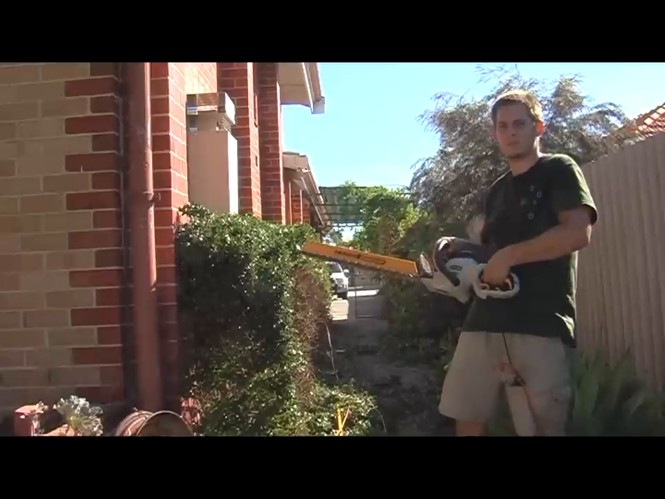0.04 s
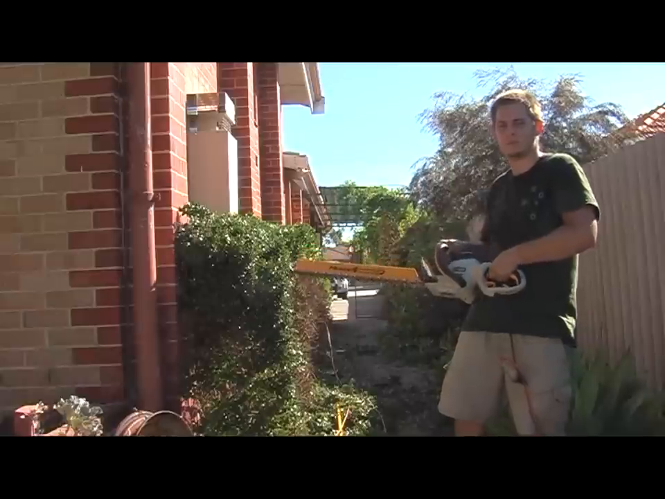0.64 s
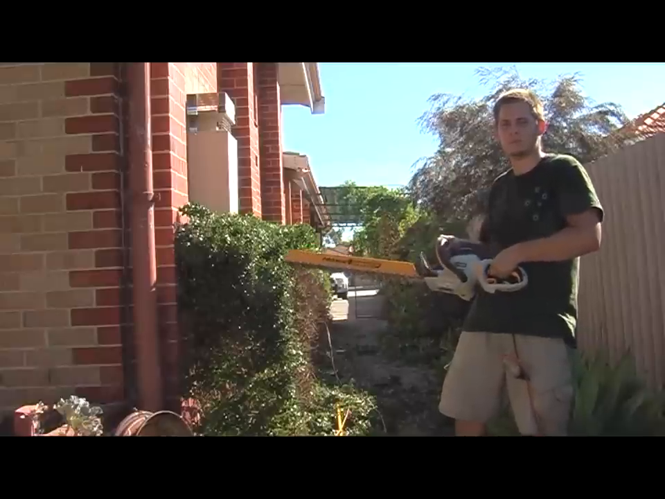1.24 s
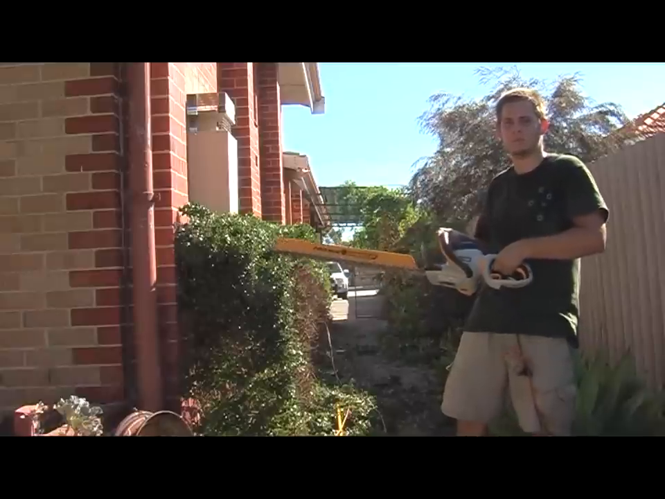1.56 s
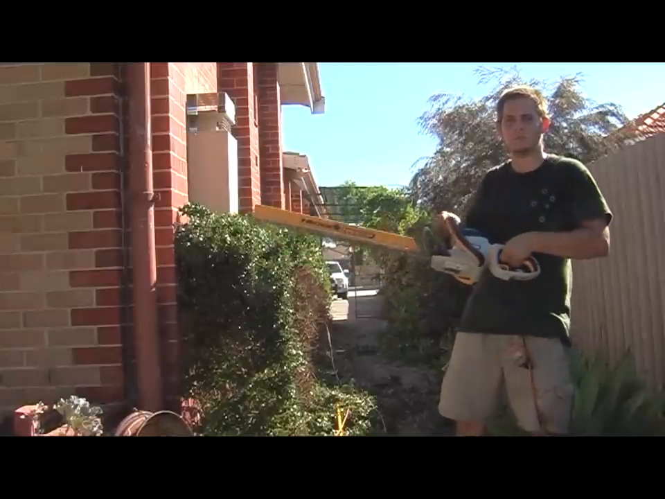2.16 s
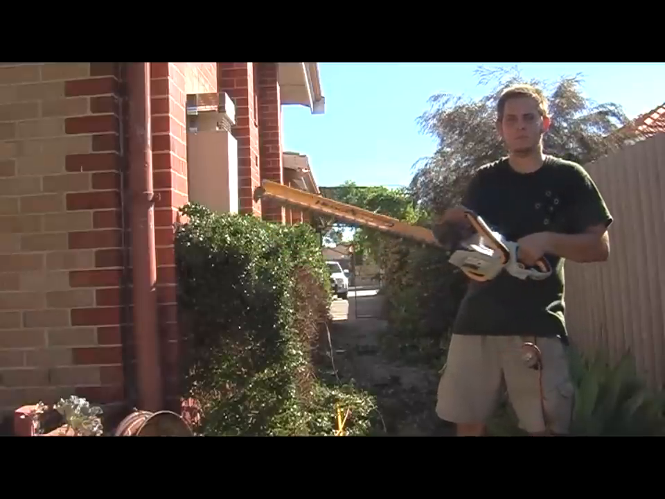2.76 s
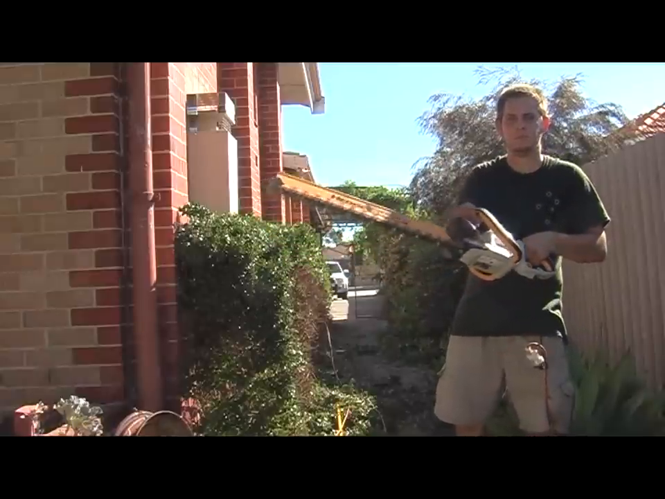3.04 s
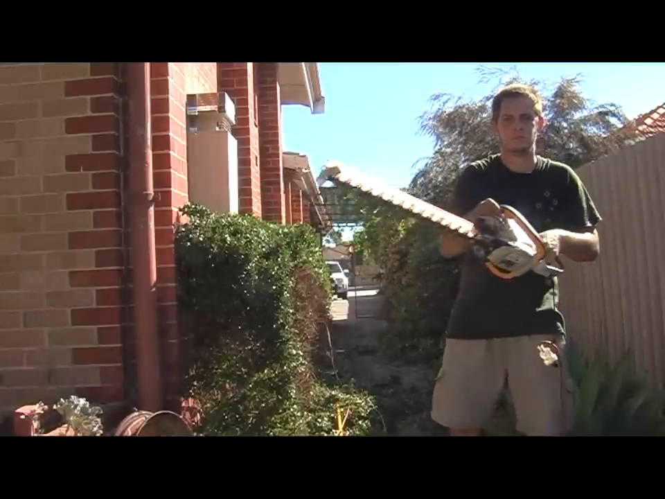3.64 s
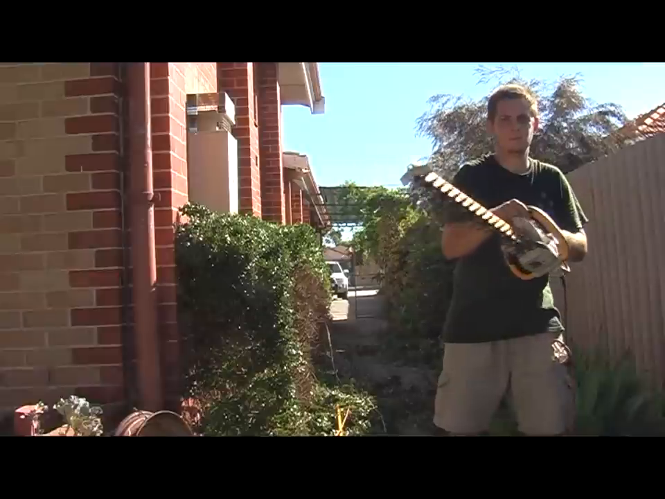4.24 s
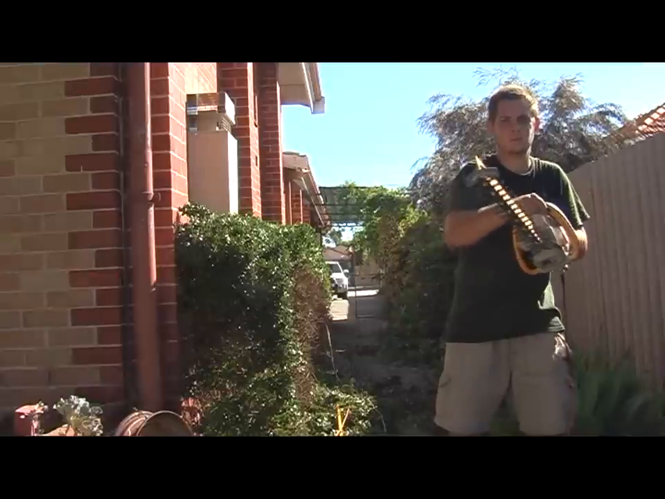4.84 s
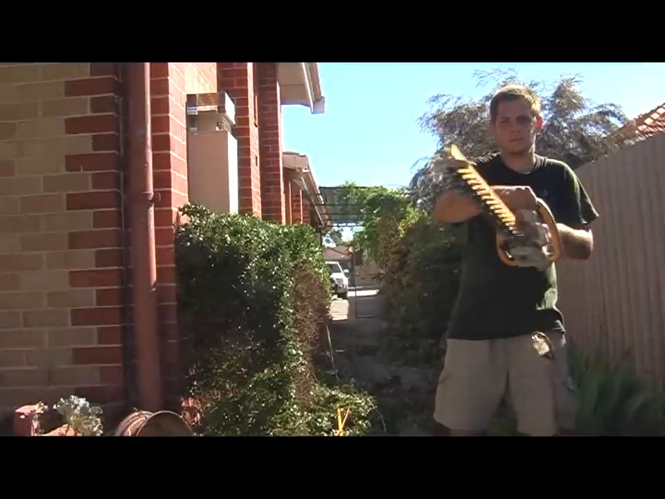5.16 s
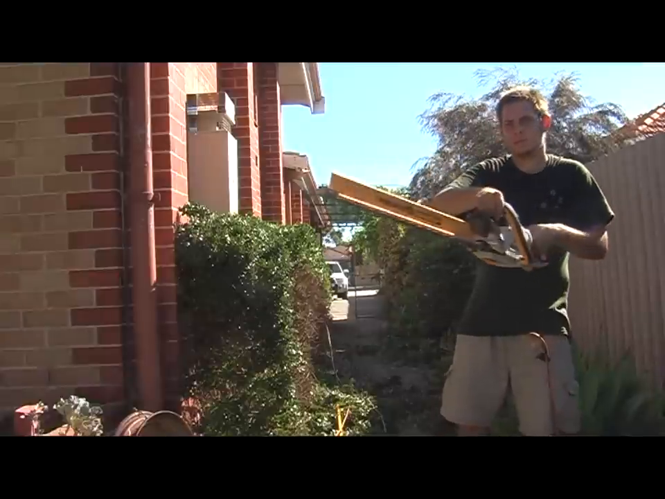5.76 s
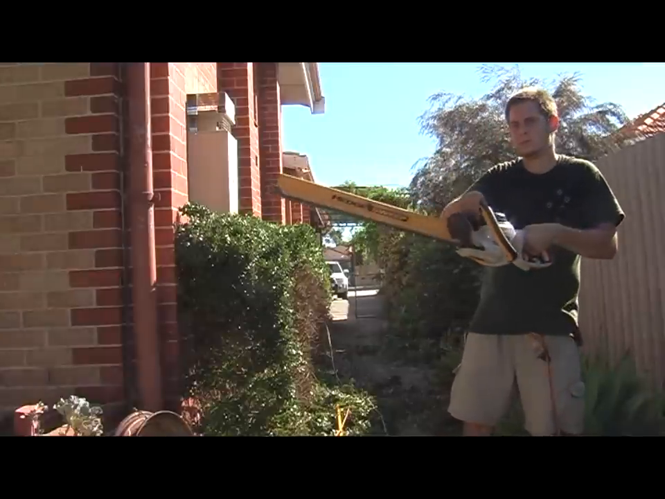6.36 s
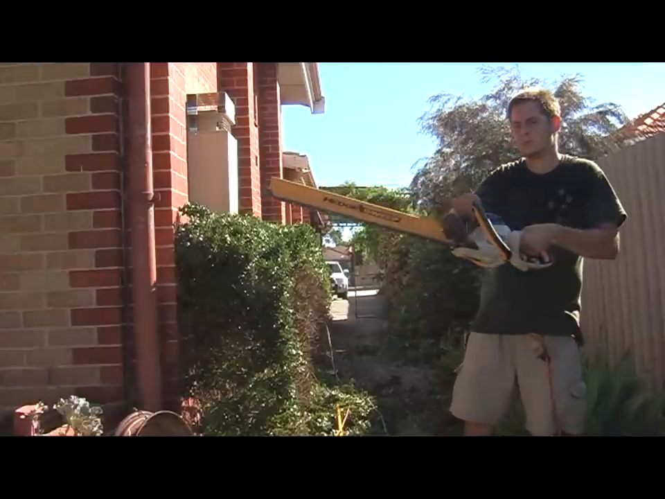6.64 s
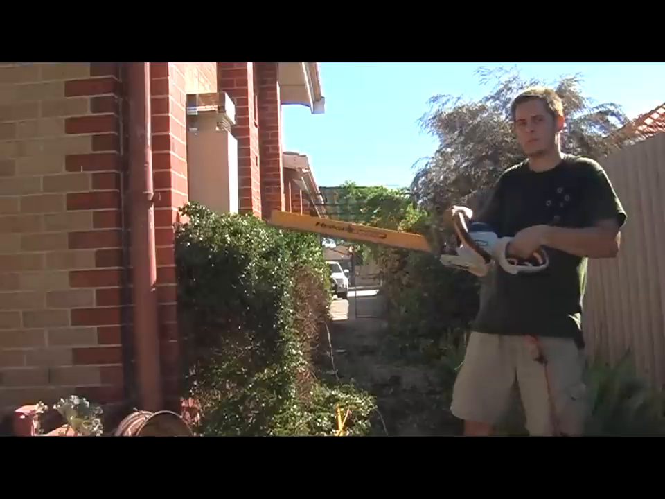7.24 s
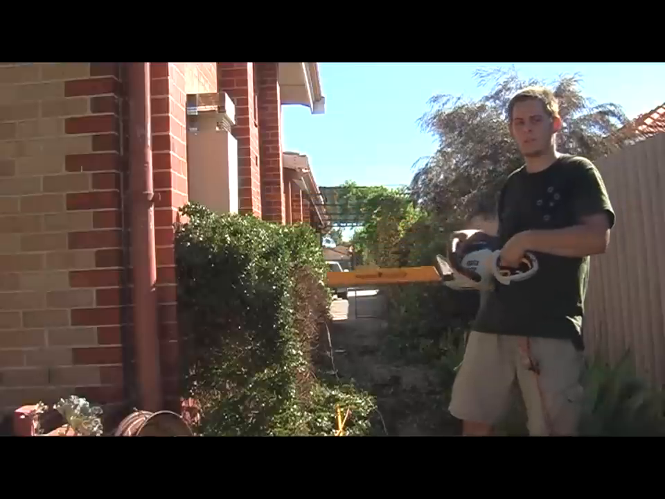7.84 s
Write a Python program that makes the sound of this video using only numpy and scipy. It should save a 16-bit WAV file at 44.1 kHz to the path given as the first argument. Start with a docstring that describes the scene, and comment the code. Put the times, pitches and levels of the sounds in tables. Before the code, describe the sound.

After faint distant traffic and some switch clicks, an electric hedge trimmer starts and keeps buzzing, its blades clattering freely.

```python
"""In a small walled garden, over distant traffic and a breeze, a hedge trimmer starts and runs free.
Safety catch and trigger click; the motor whines up and, through a 4:69 gear, cranks two steel blades.
Periodic forces give the tones (shaft hum, commutator, fan, gear mesh); knocks and friction give the
clatter and rasp. The machine radiates directionally, so its timbre changes as it is turned about.
The walls scatter echoes, and the camera's gain control pushes the garden away once the motor runs."""
import sys
import numpy as np
from scipy import signal
from scipy.fft import rfft, irfft, next_fast_len
from scipy.io import wavfile
from scipy.ndimage import uniform_filter1d, map_coordinates

SR = 44100
rng = np.random.default_rng(int(sys.argv[2]) if len(sys.argv) > 2 else 0)


def wav_record(signal):
    """Record a signal, one row per channel, as 16-bit PCM in the file named by sys.argv[1]."""
    frames = np.transpose(np.atleast_2d(signal))
    bounded = np.clip(frames, -1, 1)
    # unit amplitude maps onto the largest positive 16-bit level
    quanta = np.round(bounded * 32767).astype(np.int16)
    wavfile.write(sys.argv[1], SR, quanta)


N = 348831
TIME = np.arange(N) / SR

START_S, BITE_S, RUNNING_S = 0.785, 0.812, 0.832  # motor starts, drive bites, slack is gone
PINION_TEETH, WHEEL_TEETH, COMMUTATOR_BARS, FAN_BLADES = 4, 69, 12, 17
TOP_HZ = 463.5  # top speed of the shaft

# spectrum of traffic and breeze: (frequency [Hz], relative level [dB])
GARDEN_SPECTRUM = [(15, -45), (25, -16), (94, 0), (152, -8.5), (189, -1.5), (276, -3.5), (361, -2.5),
                   (392, -4.5), (513, -5.5), (1680, -13), (5220, -31.5), (7820, -34), (15800, -51)]
# reverberation of the walls: (frequency [Hz], t60 [s])
WALL_DECAY = [(200, 0.3), (2000, 0.38), (8000, 0.13), (16000, 0.37)]
# modes of the steel bar: (frequency [Hz], initial level [dB], t60 [s])
STEEL_MODES = [(4000, -41, 0.7), (6804, -48, .5), (6944, -44, .31)]
# catch, grip, trigger, first jolt of the blades: (time [s], level [dB], ring [Hz], ring share, t60 [s])
SNAPS = [(0.01, -39, 8500, 0.4, 0.4), (0.190, -22.5, 4500, 0.28, 0.091), (0.194, -9.5, 1900, 0.98, 0.02),
         (0.2656, -13.5, 7100, 0.35, 0.049), (0.297, -32, 3900, 0.4, 0.44), (0.431, -29, 9000, 0.5, .03),
         (0.445, -22.5, 7900, 0.45, 0.036), (0.588, -31, 1700, 0.9, 0.073),
         (0.688, -16.5, 1050, 0.62, 0.033), (0.7855, -7, 7150, 0.53, 0.027), (0.821, -2.5, 500, 0.9, 0.12)]
# noisy part of a snap: (frequency [Hz], relative level [dB])
SNAP_SPECTRUM = [(200, -30), (1200, 0), (3500, 2.5), (6000, -5), (9000, -3), (12000, -15), (16000, -26)]
# quick and slow stage of the run-up: (speed still to gain [Hz], time constant [s])
RUN_UP_STAGES = [(206.4, .12), (185.6, .34)]
# sag of the running motor: (time [s], speed lost [Hz])
SPEED_SAG = [(2.5, 0), (3.3, 1.1), (4.5, 2.1), (5.1, 1.9), (5.5, 3.8), (7.9, 3.3)]
# swing of the bar towards the microphone and back: (time [s], angle from side-on [deg])
BAR_ANGLE = [(1.6, -5), (2.2, 12), (2.6, 15), (3.2, 32), (3.9, 65), (4.6, 104), (5.1, 62), (5.5, 52),
             (6.0, 46), (6.5, 25), (7.1, 15), (7.7, 5)]
# radiation of tones: (angle [deg], shaft hum [dB], third order [dB], second gear harmonic [dB], fan [dB])
TONE_DIRECTIVITY = [(0, -39, -41, -35.5, -25), (10, -30, -34, -35.5, -26.5), (22.7, -34.5, -32, -37, -22.5),
                    (34, -36, -28.5, -37.5, -24), (52, -33.5, -31, -36, -23.5),
                    (72.5, -41.5, -26.5, -37, -25.5), (86, -50, -33, -48, -31)]
# radiation of noises: (angle [deg], housing boom [dB], ring [dB], gearbox clatter [dB], blade rasp [dB])
NOISE_DIRECTIVITY = [(0, -32.5, -21, -15.5, -20), (11.4, -30.5, -27, -15.5, -18.5),
                     (35.2, -34.5, -29, -15, -18), (88, -35.5, -34, -17.5, -18.5)]
# faces of the housing swinging past: (time [s], half length [s], frequency [Hz], gain [dB])
HOUSING_FLARES = [(1.548, 0.13, 3520, 4), (1.8, 0.1, 1370, 2), (2.22, 0.11, 3160, 5.5),
                  (2.52, 0.13, 7860, 3), (4.92, 0.16, 2180, 9), (5.6, 0.45, 7820, -4),
                  (5.8, 0.38, 2890, 7.5), (6.9, 0.23, 7820, 1), (6.95, 0.78, 3610, 7.5),
                  (7.283, 0.16, 2100, 6), (7.87, 0.073, 7820, 6.5)]
# weak partials of the motor: (shaft order, sideband [multiples of the stroke rate])
WEAK_ORDERS = [(1, 1), (2, -2), (2, 0), (3, -1), (5, -2), (5, -1), (5, 0), (6, 0), (7, -1), (7, 0), (9, -1)]
# strength of each weak partial: (relative level [dB])
WEAK_ORDER_DB = [-39, -37, -35.5, -38, -51, -29, -55, -41, -58, -39, -56]
# housing boom, gearbox clatter and blade rasp: (frequency [Hz], relative level [dB])
BOOM_SPECTRUM = [(100, -54), (280, -13.5), (370, -5.5), (440, -9.5), (520, -0.5), (700, -6.5), (1400, -33)]
CLATTER_SPECTRUM = [(150, -41.5), (350, -14.5), (650, -5), (1000, -1), (1450, -1.5), (1750, 2.5),
                    (2050, 3.5), (2300, 0.5), (2550, -1.5), (3100, -1.5), (4300, -8.5), (5700, -13.5),
                    (9000, -31), (16000, -69)]
RASP_SPECTRUM = [(800, -26), (2500, -13), (4400, 3.5), (5800, -8.5), (6600, 0), (7400, -0.5), (8300, 3),
                 (9400, -1), (10800, -2.5), (12500, -10), (14500, -16.5), (16000, -22)]
# modes of housing and blade bar: (frequency [Hz], bandwidth [Hz], relative level [dB])
BODY_MODES = [(515, 76, -3), (964, 120, -4), (1422, 113, -1), (1550, 220, -6), (1980, 130, 3),
              (3084, 77, -10.5), (3510, 69, -12), (8060, 120, -15)]
# gear whine: (time [s], relative level [dB], strongest sideband [multiples of the stroke rate])
GEAR_WHINE = [(1.0, -32, 0.13), (1.3, -22.5, -0.94), (1.6, -26, 1.1), (1.9, -17, -0.54), (2.15, -26, -0.22),
              (2.9, -35, 0.86), (3.4, -23.5, 1.8), (3.9, -23.5, 0.25), (4.6, -19.5, -0.71),
              (5.2, -23.5, 0.47), (5.65, -17, 0.98), (5.9, -18, -0.37), (6.3, -19.5, 1.3),
              (7.2, -27, -0.32), (7.6, -24, .4), (7.9, -16, 1.6)]
# filter of the stereo side signal: (frequency [Hz], gain [dB])
SIDE_GAIN = [(60, -15), (150, -8), (330, -14), (700, -12.5), (2800, -7), (5600, 0), (10000, 1), (14000, 3)]
# channel imbalance: (frequency [Hz], gain added left and taken from the right [dB])
LEFT_TILT = [(100, 0.5), (9000, -0.36), (13000, 1.5), (16000, 2)]
# the camera's hum notches: (frequency [Hz], depth [dB])
HUM_NOTCHES = [(300, 6), (600, 8.5), (900, 2.5), (1500, 1.5), (2400, 5.5), (3900, 14.5), (6000, 0.5)]


def amp(db):
    """Amplitude ratio of a level in decibels."""
    return 10 ** (np.asarray(db) / 20)


def unit(x):
    """Normalisation to rms 1."""
    return x / np.sqrt(np.mean(x ** 2) + 1e-20)


def curves(rows):
    """Linear interpolation of each column of a table over time."""
    times, *columns = np.transpose(rows)
    return [np.interp(TIME, times, column) for column in columns]


def at_hz(points, hz):
    """Interpolation on a logarithmic frequency axis."""
    frequencies, values = np.transpose(points)
    return np.interp(np.log(hz + 1), np.log(frequencies + 1), values)


def colour(x, points):
    """Linear filtering: the spectrum of x is multiplied by a gain curve."""
    size = next_fast_len(len(x))
    gain = amp(at_hz(points, np.fft.rfftfreq(size, 1 / SR)))
    return irfft(rfft(x, size) * gain, size)[:len(x)]


def drift(rate_hz):
    """Smooth random fluctuation of rms 1."""
    knots = rng.standard_normal(N // 16)
    return unit(map_coordinates(knots, [TIME[::16] * rate_hz], order=3, mode="wrap")).repeat(16)[:N]


def bump(s, width_s):
    """Gaussian pulse of height 1 around time s."""
    return np.exp(-((TIME - s) / width_s) ** 2)


def resonate(x, hz, width_hz):
    """Forced resonance, cascaded twice for steep flanks; rms 1."""
    b, a = signal.iirpeak(hz, hz / (1.55 * width_hz), fs=SR)
    return unit(signal.lfilter(b, a, signal.lfilter(b, a, x)))


def garden(air_db=-30, puff_db=6):
    """Ambient noise: distant traffic and a breeze add incoherently, with one puff of wind."""
    level_db = air_db + puff_db * bump(1.95, width_s=0.15) + 0.85 * drift(27)
    return amp(level_db) * unit(colour(rng.standard_normal(N), GARDEN_SPECTRUM))


def walls(x, echoes_per_s=2500, first_echo_s=0.012):
    """Reverberation: brick and fence scatter echoes, each band decaying at its own rate."""
    count = SR // 2
    echoes = rng.standard_normal(count) * (rng.random(count) < echoes_per_s / SR)
    echoes *= TIME[:count] > first_echo_s
    hz, t, bands = signal.stft(echoes, SR, nperseg=256)
    decay = amp(-60 * t / at_hz(WALL_DECAY, hz)[:, None])
    tail = signal.istft(bands * decay, SR, nperseg=256)[1]
    return signal.fftconvolve(x, tail / np.linalg.norm(tail))[:N]


def bar_ring(struck_s=0.2656):
    """Free vibration: jolted by the safety catch, the steel bar rings faintly in damped modes."""
    t = np.maximum(TIME - struck_s, 0)
    return sum(amp(db - 60 * t / t60) * np.sin(2 * np.pi * hz * t) for hz, db, t60 in STEEL_MODES)


def clicks():
    """Impact excitation: each snap is a decaying noise burst that rings the plastic handle."""
    out, t = np.zeros(N), np.arange(SR // 4) / SR
    for s, db, hz, share, t60 in SNAPS:
        burst = rng.standard_normal(len(t))
        snap = share * resonate(burst, hz, 0.3 * hz) + (1 - share) * unit(colour(burst, SNAP_SPECTRUM))
        out[round(s * SR):][:len(t)] += amp(db - 60 * t / t60) * snap
    return out


def shaft_speed():
    """Exponential approach to top speed in two stages, less a slight sag; in turns per second."""
    elapsed = np.maximum(TIME - START_S, 0)
    shortfall_hz = sum(hz * np.exp(-elapsed / tau) for hz, tau in RUN_UP_STAGES)
    return TOP_HZ - shortfall_hz - curves(SPEED_SAG)[0]


def motor_load():
    """Current falls linearly with speed: 1 at stall, 0 at top speed."""
    return 1 - shaft_speed() / TOP_HZ


def facing(directivity):
    """Directivity: the levels that the turning machine radiates towards the microphone."""
    degrees, *columns = np.transpose(directivity)
    angle, = curves(BAR_ANGLE)
    return [np.interp(angle, degrees, column) for column in columns]


def patched(x, patchy_db):
    """Shifting reflection off the ground, modelled as random gain patches in time and frequency."""
    bands = signal.stft(x, nperseg=1024)[2]
    patches = rng.standard_normal(bands.shape)
    for _ in range(2):
        patches = uniform_filter1d(uniform_filter1d(patches, size=32, axis=1), size=3, axis=0)
    return signal.istft(bands * amp(patchy_db * unit(patches)), nperseg=1024)[1][:N]


def flared(x, width_hz=91):
    """Beaming: a narrow band swells or fades as a face of the housing swings past."""
    out = x
    for s, half_length, hz, db in HOUSING_FLARES:
        band = signal.lfilter(*signal.iirpeak(hz, hz / width_hz, fs=SR), x)
        out = out + (amp(db) - 1) * bump(s, half_length) * band
    return out


def partial(cycles, db, waver=0.28, wander=0.072):
    """Random modulation of a sinusoid: its amplitude wavers and its phase wanders."""
    phase = cycles + rng.random() + wander * drift(9)
    return np.sqrt(2) * amp(db) * (1 + waver * drift(25)) * np.cos(2 * np.pi * phase)


def motor(turns, strokes, surge_db=17, surge_load=0.067, fan_flutter_db=1.4):
    """Periodic forcing: shaft, commutator, fan and teeth sound at multiples of the rotation rate."""
    hum_db, third_db, overtone_db, fan_db = facing(TONE_DIRECTIVITY)
    load = motor_load()
    spin_db = -40 * load  # imbalance sounds only once the shaft spins fast
    out = partial(turns, hum_db + spin_db) + partial(3 * turns, third_db + spin_db)
    brush_db = -42.5 + surge_db * np.tanh(load / surge_load)  # current strengthens the whine
    out += (1 - load) * partial(COMMUTATOR_BARS * turns, brush_db)
    fan_db = fan_db - 85 * load + fan_flutter_db * drift(7.7)
    out += partial(FAN_BLADES * turns, fan_db, waver=0.13, wander=0.04)
    gear_overtone = 2 * PINION_TEETH * turns
    out += partial(gear_overtone, overtone_db) + partial(gear_overtone - strokes, overtone_db)
    for (order, sideband), db in zip(WEAK_ORDERS, WEAK_ORDER_DB):
        level_db = db + spin_db + 2 * drift(3.06)
        out += partial(order * turns + sideband * strokes, level_db, waver=0.2, wander=0.029)
    return out


def knocks(strokes, decay_strokes, depth, uneven=0.8):
    """Backlash: the envelope jumps by a random amount as each stroke takes up slack, then decays."""
    size = 1 + uneven * rng.uniform(-1, 1, 1000)[strokes.astype(int) % 1000]
    return 1 + depth * size * np.exp(-(strokes % 1) / decay_strokes)


def blades(strokes, ticks_per_s=2000):
    """Impact and friction: at every stroke the crank knocks in its housing and steel rasps on steel."""
    boom_db, ring_db, clatter_db, rasp_db = facing(NOISE_DIRECTIVITY)
    load = motor_load()
    air, gears, steel, grit, blows = rng.standard_normal((5, N))
    ticks = unit(grit * (rng.random(N) < ticks_per_s / SR))  # teeth catching on each other
    lopsided = 1 + 0.088 * np.cos(np.pi * strokes)  # the outward stroke knocks harder than the return
    crank = lopsided * knocks(strokes + 0.5, decay_strokes=0.44, depth=0.13)
    boom = unit(colour(air * crank, BOOM_SPECTRUM))
    clatter = np.sqrt(1 - load) * unit(patched(colour(gears * crank, CLATTER_SPECTRUM), patchy_db=0.94))
    ring = unit(sum(amp(db) * resonate(blows * crank, hz, width) for hz, width, db in BODY_MODES))
    scrape = (steel + 0.19 * ticks) * knocks(strokes, decay_strokes=0.32, depth=0.76)
    rasp = unit(patched(colour(scrape, RASP_SPECTRUM), patchy_db=2.0))
    # load drives each layer harder while the motor jerks the blades up to speed
    return (amp(boom_db + 8 * load) * boom + amp(ring_db + 20 * load) * ring
            + amp(clatter_db + 14 * load) * clatter + amp(rasp_db + 2.5 * load) * rasp)


def gear_whine(turns, strokes, spread=0.88, waver=0.057):
    """Modulation of the tooth-mesh tone: sidebands in step make it throb at every blade stroke."""
    level_db, strongest = curves(GEAR_WHINE)
    sidebands = np.arange(-2, 4)[:, None]
    weights = np.exp(-0.5 * ((sidebands - strongest) / spread) ** 2)
    out = np.zeros(N)
    for sideband, share in zip(sidebands, weights / weights.sum(0)):
        phase = PINION_TEETH * turns + sideband * (strokes + 0.35) + 0.09 * drift(3)
        out += np.sqrt(2 * share) * (1 + waver * drift(25)) * np.cos(2 * np.pi * phase)
    return amp(level_db) * out


def trimmer(slack_gain=0.12, rest_db=3.5, growth_db=15, rest_strokes=-0.32):
    """Gear coupling: one shaft times motor, gear and blades, and the level rises with its speed."""
    speed_hz = shaft_speed()
    turns = np.cumsum(speed_hz * (TIME > START_S)) / SR
    strokes = 2 * turns * PINION_TEETH / WHEEL_TEETH + rest_strokes  # two per turn of the crank
    onset = np.interp(TIME, [START_S, START_S + 0.007, BITE_S, RUNNING_S], [0, slack_gain, slack_gain, 1])
    machine = flared(blades(strokes) + motor(turns, strokes) + gear_whine(turns, strokes))
    return onset * amp(rest_db + growth_db * (speed_hz / TOP_HZ) ** 2) * machine


def scene():
    """Superposition in mid and side: the machine is straight ahead; echoes and garden give the width."""
    handling = clicks() + bar_ring()
    near = trimmer() + handling + amp(-5.5) * walls(handling)
    mid = near + garden()
    delayed = np.interp(TIME - 0.0013, TIME, near, left=0)
    side = colour(0.42 * walls(near) + 0.22 * delayed + garden(), SIDE_GAIN)
    right_tilt = [(hz, -db) for hz, db in LEFT_TILT]
    return np.array([colour(mid + side, LEFT_TILT), colour(mid - side, right_tilt)])


def hum_notches(x, hum_hz=300, width_hz=22):
    """Comb filtering: the camera cuts narrow notches at the harmonics of its drum's hum."""
    size = next_fast_len(N)
    hz = np.fft.rfftfreq(size, 1 / SR)
    detuning_hz = hz - hum_hz * np.maximum(np.round(hz / hum_hz), 1)
    cut_db = at_hz(HUM_NOTCHES, hz) / (1 + (detuning_hz / width_hz) ** 2)
    return irfft(rfft(x, size) * amp(-cut_db), size)[:, :N]


def record(dry, threshold_db=-11.5, slope=0.9, detector_s=0.007, recover_db_per_s=1.0, edge_hz=15780):
    """Compression: after the notches, gain falls fast and recovers slowly; then soft clip and low-pass."""
    sound = hum_notches(dry)
    pole = np.exp(-1 / (detector_s * SR))
    power = signal.lfilter([1 - pole], [1, -pole], (sound ** 2).mean(0))
    power_db = 10 * np.log10(power + 1e-12)
    release_db = TIME * recover_db_per_s
    peak_db = np.maximum.accumulate(power_db + release_db) - release_db
    compressed = sound / amp(slope * np.maximum(peak_db - threshold_db, 0))
    clipped = compressed / (1 + compressed ** 8) ** (1 / 8)
    low_pass = signal.firwin(701, edge_hz, window=("kaiser", 9), fs=SR)
    return signal.oaconvolve(clipped, low_pass[None], "same")


dry = scene()
out = record(dry)
wav_record(out)
```